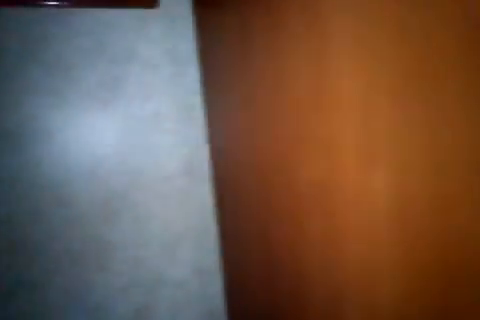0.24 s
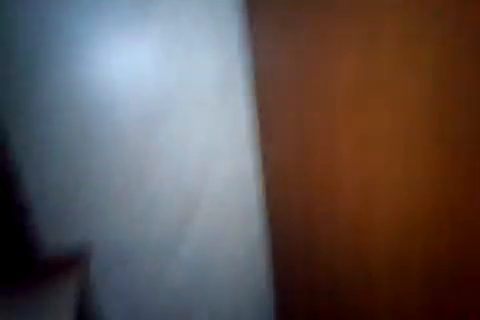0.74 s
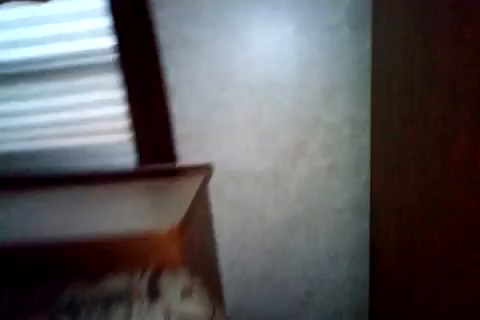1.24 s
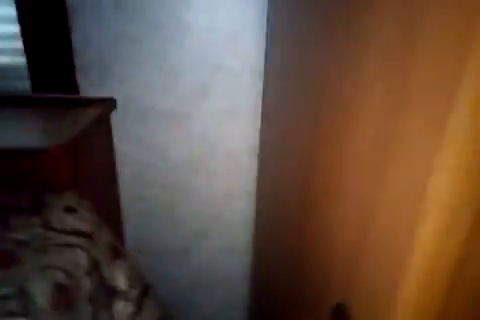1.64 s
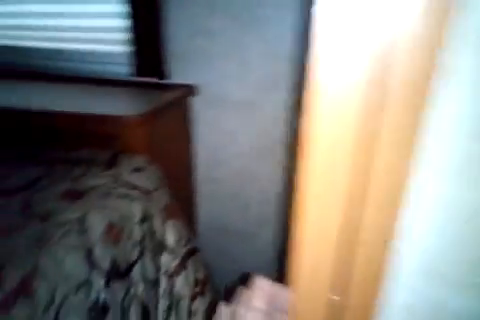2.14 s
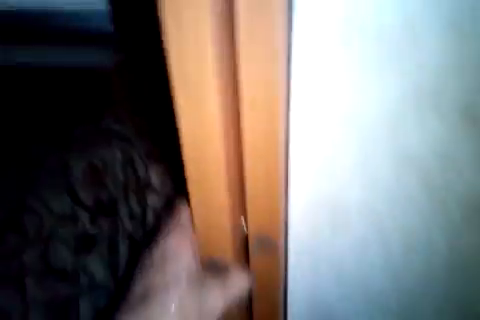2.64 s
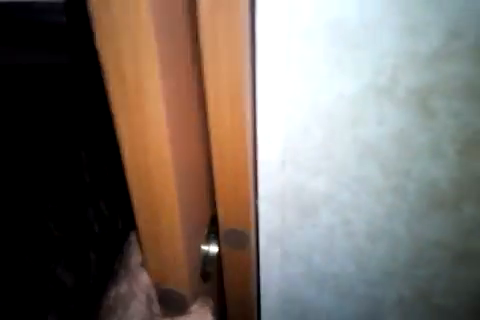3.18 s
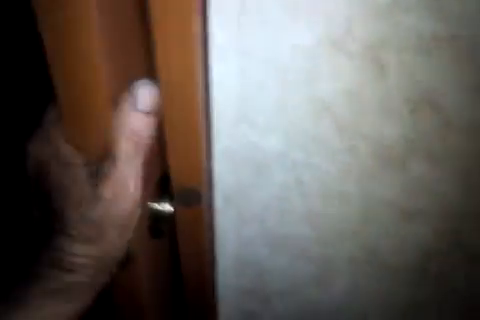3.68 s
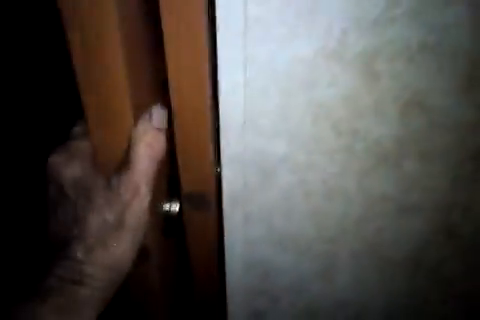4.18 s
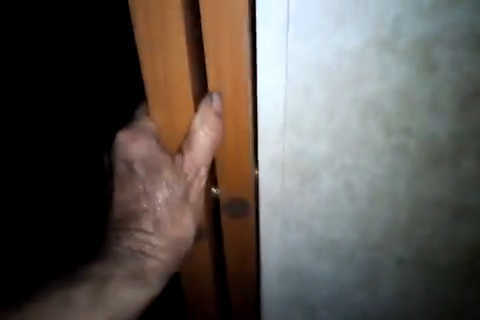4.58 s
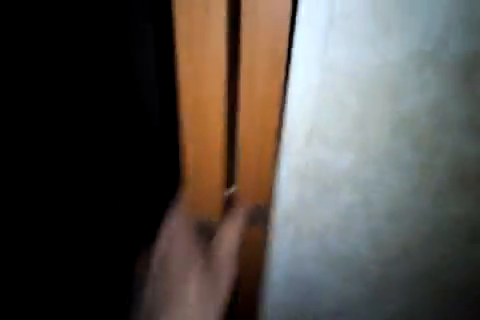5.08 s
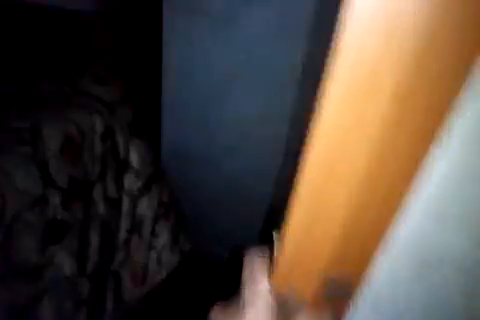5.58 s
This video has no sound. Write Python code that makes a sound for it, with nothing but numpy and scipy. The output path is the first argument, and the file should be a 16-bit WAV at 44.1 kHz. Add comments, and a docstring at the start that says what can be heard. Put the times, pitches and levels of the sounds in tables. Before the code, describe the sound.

Close to the microphone in a small, padded vehicle cabin, a hand moves a light wooden folding door. Faint taps and brushing come first, then a sharp clack and low thumps near two seconds, a pause, a loud clattering bang near four, and softer knocks afterwards. A faint low background noise stays steady.

```python
"""Small knocks and light brushing over a steady low background: a hand folds and shuts a light wooden door
close by, inside a small padded cabin. The panels thump and rumble as they slide: blows and slips ring their
modes. Catch, hinges and door edge click and rattle: contact noise, heard directly and through the ringing modes
of catch and door edge. Skin and cloth brush the wood as shaped slips; the hinge squeaks faintly."""
import sys
import numpy as np
from scipy import signal
from scipy.fft import rfft, irfft
from scipy.io import wavfile
from scipy.ndimage import uniform_filter1d

SR = 44100
rng = np.random.default_rng(int(sys.argv[2]) if len(sys.argv) > 2 else 0)


def digitize_waveform(pressure):
    """Quantize a signal to 16-bit integers and store it at the path in sys.argv[1].

    Rows of a 2-D input are taken as channels; values are limited to [-1, 1].
    """
    field = np.atleast_2d(pressure).T
    bounded = np.clip(field, -1, 1)
    quanta = np.round(bounded * 32767).astype(np.int16)
    wavfile.write(sys.argv[1], SR, quanta)


N = 256662


def gain_of(db):
    """Amplitude factor for a level in dB."""
    return 10 ** (np.asarray(db) / 20)


def dying(t, t60):
    """Exponential decay that falls 60 dB in t60 seconds."""
    return gain_of(-60 * t / t60)


def evened(x):
    """Scales x to an RMS of one."""
    return x / np.sqrt(np.mean(x ** 2) + 1e-20)


def bins(length):
    """Frequencies in Hz of the spectrum of a sound this many samples long."""
    return np.fft.rfftfreq(length, 1 / SR)


def add(mix, start_s, sound):
    """Lays a sound into the mix at its start, cut off at the end of the mix."""
    part = mix[round(start_s * SR):][:len(sound)]
    part += sound[:len(part)]


def coloured(x, points):
    """Shapes the spectrum of x by (Hz, dB) points, joined along log frequency."""
    point_hz, point_db = np.transpose(points)
    curve_db = np.interp(np.log(bins(len(x)) + 1), np.log(point_hz + 1), point_db)
    return irfft(rfft(x) * gain_of(curve_db), len(x))


def near(hz, centre_hz, octaves):
    """Gain that falls away on both sides of the centre that a blow excites."""
    return np.exp(-.5 * (np.log2((hz + 1) / centre_hz) / max(octaves, .1)) ** 2)


def ring(hz, gain, t60, t):
    """A sum of dying modes."""
    modes = dying(t, t60[:, None]) * np.sin(2 * np.pi * hz[:, None] * t)
    return gain @ modes


# tone of air and electronics: pitch_hz, relative level_db per Hz
BACKGROUND_TONE = [(12, -61), (20, -9), (107, 0), (347, -9), (780, -15.5), (897, -16.5), (1910, -23.5),
                   (4540, -24.5), (6530, -28.5), (8400, -39.5), (13500, -41.5), (14700, -28.5),
                   (16000, -40)]
BACKGROUND_DB = -57  # RMS


def background():
    """Steady noise of air and electronics, shaped from white noise."""
    return gain_of(BACKGROUND_DB) * evened(coloured(rng.standard_normal(N), BACKGROUND_TONE))


# faint hinge squeaks: start_s, length_s, level_db (RMS before the swell)
HINGE_SQUEAKS = [(4.328, 0.18, -68), (5.282, 0.24, -72)]
SQUEAK_HZ, SQUEAK_OCTAVES = 4630, 0.049


def squeaks():
    """A narrow hiss that swells and fades."""
    out = np.zeros(N)
    for start_s, length_s, level_db in HINGE_SQUEAKS:
        t = np.arange(round(length_s * SR)) / SR
        octaves_away = np.log2((bins(len(t)) + 1) / SQUEAK_HZ)
        band = np.exp(-.5 * (octaves_away / SQUEAK_OCTAVES) ** 2)
        hiss = irfft(rfft(rng.standard_normal(len(t))) * band, len(t))
        swell = np.sin(np.pi * t / length_s)
        add(out, start_s, gain_of(level_db) * swell * evened(hiss))
    return out


def slips(per_s, spread_db):
    """Uneven stick-slip impulses of random sign; a few are larger."""
    size_db = spread_db * np.minimum(rng.exponential(1, N), 4)
    size = gain_of(size_db) * rng.choice([-1., 1.], N)
    return size * (rng.random(N) < per_s / SR)


# the door being moved and rubbed: time_s, rumble_db in the panels, brushing_db on the surface
DOOR_MOVES = [(0, -66, -53), (.08, -53, -59), (.23, -66, -64), (.46, -73, -63), (.9, -51, -61),
              (1.04, -60, -52.5), (1.14, -78, -59), (1.44, -45.5, -58), (1.54, -46, -47), (1.61, -42, -53),
              (1.68, -43.5, -63), (1.8, -32, -39), (1.94, -47, -48.5), (2.04, -38.5, -57), (2.2, -47, -62),
              (2.32, -40, -50), (2.44, -26, -42), (2.53, -34, -44), (2.61, -43, -59), (2.74, -47, -57),
              (3.1, -61, -65), (3.3, -54, -65), (3.6, -49, -62), (3.76, -56, -63), (3.84, -51, -48),
              (3.91, -41, -33), (3.96, -27, -36.5), (4.04, -28, -46), (4.11, -44, -63), (4.18, -52, -63),
              (4.24, -45, -61), (4.7, -57, -65), (4.97, -64, -71), (5.08, -45, -66), (5.23, -56, -70),
              (5.39, -54, -60), (5.51, -54.5, -63), (5.63, -44.5, -56.5), (5.82, -54, -69)]
# panel modes, also rung by the thumps: pitch_hz, level_db, ring time (factor on a base t60)
PANEL_MODES = [(35.7, -19, 0.28), (52, -5.5, 1.43), (77.5, -0.5, 0.67), (108, -1.5, 0.67), (164, 0, 0.54),
               (204.7, 2, 0.36), (271.9, 0.5, 0.79), (334, 3, 0.56), (439.8, -12, 1.12), (483, -6, 1.16),
               (560.5, 3.5, 0.55), (723, -5.5, 0.6), (795.4, 3, 0.86), (961, 24, 0.24)]
# tone of skin on wood: pitch_hz, relative level_db per Hz
SKIN_TONE = [(240, -31), (400, -2), (527, -7), (646, -5.5), (1870, -18.5), (2060, -21), (7000, -45),
             (9100, -60), (15400, -120)]
# tone of cloth on wood: pitch_hz, relative level_db per Hz
CLOTH_TONE = [(590, -11), (1000, 4.5), (1430, -3), (2330, 0.5), (4690, -4), (6460, -3.5), (9000, -34),
              (11700, -55), (19800, -120)]
# light brushing leans to cloth, firm brushing is skin: cloth share at LIGHT_DB, and its change per dB
LIGHT_DB, CLOTH_SHARE, CLOTH_PER_DB = -60.5, 0.44, -0.08


def moving():
    """Slips drive the panel modes as rumble; finer slips give the brushing, dull for skin, bright for cloth."""
    now, t = np.arange(N) / SR, np.arange(6000) / SR
    time_s, *levels = np.transpose(DOOR_MOVES)
    rumble_db, brush_db = (np.interp(now, time_s, level) for level in levels)

    hz, mode_db, lasting = np.transpose(PANEL_MODES)
    body = ring(hz, gain_of(mode_db) * near(hz, 155, 0.95), 0.11 * lasting, t)
    rumble = evened(signal.oaconvolve(slips(320, .8), body)[:N])

    fine = slips(5000, 2.5)
    cloth = np.clip(CLOTH_SHARE + CLOTH_PER_DB * (brush_db - LIGHT_DB), 0, 1)
    brush = (1 - cloth) * evened(coloured(fine, SKIN_TONE))
    brush += cloth * evened(coloured(fine, CLOTH_TONE))
    return gain_of(rumble_db) * rumble + gain_of(brush_db) * brush


# dull blows on the panels: start_s, level_db, centre pitch_hz, base t60_s (scaled for each mode)
PANEL_BLOWS = [(.111, -41.5, 465, .067), (.146, -41.5, 86, .17), (.199, -45, 62, 0.16),
               (.746, -44, 514, .25), (.766, -42.5, 93, .37), (.797, -40.5, 304, 0.1),
               (1.129, -42, 283, 0.45), (1.168, -41.5, 312, 0.27), (1.439, -36.5, 191, 0.28),
               (1.479, -32, 67, .11), (1.594, -25, 73, 0.23), (1.694, -34.5, 261, 0.2),
               (1.716, -27.5, 280, 0.29), (1.732, -23, 159, 0.15), (1.799, -29, 92, 0.89),
               (1.852, -17, 282, .2), (1.877, -16.5, 161, 0.18), (1.914, -16.5, 82, 0.25),
               (1.945, -22, 83, 0.073), (2.068, -33, 97.5, 0.15), (2.147, -34.5, 67, 0.26),
               (2.33, -30, 130, 0.16), (2.36, -23.5, 169, 0.38), (2.401, -26, 192, 0.14),
               (2.444, -24, 131, 0.4), (2.469, -10, 152, 0.27), (2.489, -19, 180, 0.12),
               (2.529, -28, 173, 0.29), (2.7, -37.5, 77.5, 0.16), (3.276, -39.5, 108, 0.13),
               (3.299, -33.5, 334, .6), (3.338, -31.5, 122, 0.18), (3.399, -34, 197, 0.083),
               (3.649, -41, 328, .47), (3.781, -20, 185, 0.12), (3.796, -17, 131, 0.26),
               (3.817, -10, 97, 0.092), (3.833, -12.5, 570, .2), (3.848, -16.5, 237, 0.38),
               (3.86, -23, 119, 0.25), (3.891, -21.5, 67, .2), (3.954, -17, 188, .37),
               (3.981, -13, 159, 0.24), (4.009, -19.5, 209, .34), (4.036, -18, 148, 0.27),
               (4.06, -29, 320, 0.18), (4.088, -33, 160, .25), (4.147, -35.5, 89, 0.16),
               (4.205, -35, 94, 0.34), (4.247, -39.5, 102, .27), (4.328, -37, 103, 0.18),
               (4.4, -40.5, 104, 0.11), (4.538, -42.5, 267, 0.5), (4.677, -40.5, 125, 0.52),
               (4.718, -38, 91, .27), (4.801, -42, 114, 0.34), (5.015, -40.5, 101, 0.23),
               (5.056, -41.5, 146, 0.2), (5.123, -42.5, 112, 0.54), (5.161, -34, 202, 0.071),
               (5.528, -29.5, 97, 0.15), (5.558, -25.5, 108, 0.18), (5.592, -30, 320, .2),
               (5.61, -27.5, 87.5, 0.16), (5.644, -35, 103, 0.42), (5.707, -34.5, 94, 0.44)]
THUMP_OCTAVES, THUMP_NARROWING = 0.53, .09  # spread at 100 Hz, less per octave up
FRAME_DB, FRAME_PER_DB = -10.5, -0.0538  # stiff frame's share in a -29 dB blow, change per dB of blow


def thumps():
    """A soft blow rings the panel modes near its centre and the frame's around 379 Hz, both building gently."""
    t, out = np.arange(9000) / SR, np.zeros(N)
    hz, mode_db, lasting = np.transpose(PANEL_MODES)
    # each blow's modes are detuned a little at random
    detune = 1 + 0.02 * rng.standard_normal((len(PANEL_BLOWS), len(hz)))
    for (start_s, level_db, centre_hz, t60_s), shift in zip(PANEL_BLOWS, detune):
        octaves = THUMP_OCTAVES - THUMP_NARROWING * np.log2(centre_hz / 100)
        panel_gain = gain_of(mode_db) * near(hz, centre_hz, octaves)
        panel = ring(hz * shift, panel_gain, t60_s * lasting, t)
        panel *= (1 - np.exp(-t * centre_hz / 0.36)) ** 2  # builds over about a cycle of the centre

        frame_gain = gain_of(mode_db) * near(hz, 379, 0.61)
        frame = ring(hz / shift, frame_gain, 0.39 * t60_s * lasting, t)
        frame *= (1 - np.exp(-t / 0.0071)) ** 2
        frame_share = gain_of(FRAME_DB + FRAME_PER_DB * (level_db + 29))

        blow = panel / abs(panel).max() + frame_share * frame / abs(frame).max()
        add(out, start_s, gain_of(level_db) * blow)
    return out


# knocks and short scrapes of catch, hinge and door edge:
# start_s, level_db, centre pitch_hz, spread_octaves, rise_ms (twice the time constant), contact noise t60_s
CATCH_KNOCKS = [(.003, -35, 900, .9, 2.4, .06), (.052, -30, 1100, 1.2, 1.6, 0.049),
                (.085, -35, 1100, 1.4, 2.4, .12), (.11, -39, 700, .77, 4.5, .17),
                (.177, -36, 4970, .3, .9, .1), (.184, -37, 4400, .3, 1.3, .15),
                (.197, -41.5, 1500, .57, 2.1, .07), (.735, -38, 1160, .74, 2.6, 0.085),
                (.748, -29, 740, .91, 1.3, 0.079), (.93, -46.5, 5900, .35, 8, 0.33),
                (.97, -45, 3960, .68, 8, 0.39), (1.05, -39.5, 2000, 1.1, 1.9, 0.1),
                (1.133, -30, 1100, 1.2, 2.2, 0.091), (1.17, -32, 1120, 1.3, 5, 0.13),
                (1.301, -32.5, 2020, .82, 0.34, 0.062), (1.42, -40, 4000, .58, 0.59, .042),
                (1.423, -29.5, 1540, 1.1, 3.2, 0.094), (1.446, -29, 1250, .98, 2.55, 0.21),
                (1.456, -32, 3850, .52, 0.49, 0.14), (1.475, -40, 4500, .8, 6.4, .12),
                (1.499, -36.5, 1670, .9, 1.6, 0.094), (1.596, -38, 1500, .63, 1.7, .071),
                (1.692, -31.5, 1980, 1.1, 1.4, 0.082), (1.728, -29, 1470, 1.3, 0.22, 0.21),
                (1.777, -29, 3000, 1.1, 1.7, 0.26), (1.821, -27, 1730, .57, .68, .066),
                (1.851, -8, 1800, 1.06, 0.82, .11), (1.879, -31, 1500, 1.2, 1.2, .16),
                (2.062, -31, 2330, .92, 2.5, .23), (2.254, -32.5, 2400, .58, 0.39, .11),
                (2.258, -29.5, 1100, .6, 2.24, .078), (2.291, -40, 2490, 1.14, .5, .16),
                (2.36, -35, 800, 1.1, 9.2, .22), (2.4, -31, 800, 1.05, 6, 0.12),
                (2.443, -28.5, 2150, .87, .6, 0.3), (2.469, -42, 5000, .68, 2.6, 0.19),
                (2.486, -25, 3180, .45, 7.6, .14), (2.529, -32.5, 2900, .46, 2.8, 0.21),
                (2.555, -29.5, 1800, .98, 1.6, 0.12), (2.74, -47.5, 2500, 1.05, 2.3, .09),
                (2.765, -40, 1500, 1.1, 2.5, .072), (3.313, -37.5, 4500, .98, .9, 0.14),
                (3.33, -36, 890, .9, 2.6, .16), (3.397, -45.5, 5000, .47, 1.7, .065),
                (3.643, -39.5, 890, 1.05, 2.2, 0.083), (3.775, -31, 1150, .88, .39, 0.12),
                (3.786, -40.5, 4500, .61, 2.2, 0.17), (3.801, -27, 1480, 1.1, 3.4, 0.36),
                (3.814, -20.5, 2620, .74, 5.2, 0.14), (3.827, -15.5, 3520, .74, 2.2, 0.042),
                (3.835, -13, 1790, 1.05, 0.46, 0.092), (3.841, -15, 835, .48, 2.9, 0.32),
                (3.849, -20.5, 2700, .53, 1.6, 0.12), (3.859, -21, 990, .65, 1.9, 0.065),
                (3.884, -23, 1500, 1.05, 2.77, 0.14), (3.903, -27.5, 3770, .64, 4, .053),
                (3.914, -19.5, 3000, .95, 5.5, .086), (3.953, -24, 1480, .3, .9, .23),
                (3.974, -32, 4300, .17, .84, .14), (3.978, -21.5, 1460, 1.15, 5.9, 0.23),
                (4.006, -29, 2800, .33, 6.4, .13), (4.213, -42.5, 900, 1.1, 4.9, .22),
                (4.257, -43, 1350, 1.1, 3, 0.13), (4.516, -46, 5260, .44, 3, 0.064),
                (4.53, -39, 800, .88, 4.6, 0.18), (4.563, -46, 4000, 1.5, .43, 0.046),
                (4.73, -47, 1500, .9, 6, 0.23), (4.775, -40, 2800, .67, 1.6, 0.054),
                (5.01, -45.5, 800, .52, 5.8, .5), (5.054, -39, 890, .6, 4.5, 0.12),
                (5.131, -34, 970, .77, 3.7, .083), (5.33, -39, 800, 1.05, 4.7, 0.1),
                (5.434, -49, 5200, .31, 2.5, .16), (5.525, -41, 910, 1.1, 1.6, 0.56),
                (5.543, -33, 1900, .6, 2.1, .12), (5.551, -26.5, 1140, .65, 2.1, 0.093),
                (5.561, -25, 3500, .83, 0.17, 0.017), (5.571, -36.5, 2500, 1.1, 3, 0.16),
                (5.597, -35, 3750, .76, .25, 0.021), (5.664, -38, 1600, 1.3, 2.3, 0.06)]
# pings, where one part of the catch rings alone: start_s, level_db, centre pitch_hz, contact noise t60_s
CATCH_PINGS = [(0.188, -38, 2550, .08), (1.301, -40, 1660, .2), (1.352, -42, 1660, .08),
               (1.356, -49, 3800, .045), (1.541, -43, 1660, .15), (2.182, -46, 1290, .07),
               (2.289, -42.5, 5900, .08), (3.775, -34, 1150, .1), (3.972, -26, 5900, .26)]
# catch and door edge modes: pitch_hz, level_db, t60_s
CATCH_MODES = [(720, 10, 0.07), (800, 13.5, 0.043), (881, 9, 0.2), (1026, 9, 0.081), (1200, 3.5, 0.079),
               (1430, 7, 0.05), (1660, -2, 0.11), (2060, -15, 0.033), (2550, -6.5, 0.037),
               (2806, -12, 0.059), (3115, -9.5, 0.053), (3790, -11, 0.088), (4300, -3, 0.035),
               (4690, -1.5, 0.042), (5770, -17, 0.046), (5900, -17, 0.086), (6230, -14, .07)]
KNOCK_RING, PING_RING = .38, .68  # share heard through the modes
PING_OCTAVES, PING_RISE_MS = .22, 1.1


def knocks():
    """Contact noise swelling around the blow's centre, with a hard tick during its rise when quick,
    heard directly and through the modes near it."""
    t, out = np.arange(6144) / SR, np.zeros(N)
    hz, mode_db, mode_t60 = np.transpose(CATCH_MODES)
    blows = [(*row, KNOCK_RING) for row in CATCH_KNOCKS]
    for start_s, level_db, centre_hz, t60_s in CATCH_PINGS:
        blows.append((start_s, level_db, centre_hz, PING_OCTAVES, PING_RISE_MS, t60_s, PING_RING))

    for start_s, level_db, centre_hz, octaves, rise_ms, t60_s, share in blows:
        chatter, drive, bounce = rng.standard_normal((3, len(t)))
        band = near(bins(len(t)), centre_hz, octaves)
        impulse = np.zeros(len(t))
        impulse[round(rise_ms * SR / 1000) + 8] = 1
        tick = irfft(rfft(impulse) * (band + 0.045))  # the hard edge reaches the top of the band
        tick *= 1.6 * np.exp(-rise_ms / 0.95) / abs(tick).max()  # only a quick blow gives a clean tick

        rise = (1 - np.exp(-t * 2000 / rise_ms)) ** 2
        wobble = evened(uniform_filter1d(bounce, size=160))
        rise *= gain_of(3.0 * np.minimum(t / 0.01, 1) * wobble)  # loose parts bounce

        crack_fall = dying(t, t60_s) + 0.41 * dying(t, 0.0083)
        crack = evened(irfft(rfft(chatter) * band)) * rise * crack_fall

        body = ring(hz, gain_of(mode_db) * near(hz, centre_hz, 0.42 * octaves), mode_t60, t)
        push = (drive + 9.8 * impulse) * rise * dying(t, 0.24 * t60_s)
        rung = signal.fftconvolve(push, body)[:len(t)]

        knock = tick + (1 - share) * crack / 2.72 + share * rung / abs(rung).max()
        add(out, start_s, gain_of(level_db) * knock)
    return out


CABIN_T60_S, CABIN_DB = 0.23, -11.5


def cabin(x):
    """Short tail of dense reflections from the near walls, as decaying noise."""
    t = np.arange(9000) / SR
    build = np.minimum(t / 0.013, 1)
    taps = rng.standard_normal(len(t)) * dying(t, CABIN_T60_S) * build
    return gain_of(CABIN_DB) * signal.oaconvolve(x, taps / np.linalg.norm(taps))[:N]


def scene():
    """Knocks and thumps with the cabin's tail, the moving door and its hinge."""
    sharp, dull = knocks(), thumps()
    tail = cabin(sharp + gain_of(-7.5) * dull)
    return (sharp + dull + tail + moving() + squeaks())[None]


# microphone colour: pitch_hz, gain_db
MICROPHONE_TONE = [(20, -21.2), (70, -3.1), (5500, .4), (7000, -2.7), (8500, -8.8), (12000, -3.2),
                   (16000, -21)]
EDGE_HZ = 15800  # top of the band


def record(dry):
    """Microphone colour on the scene, the steady background, then the band limit on both."""
    heard = coloured(dry[0], MICROPHONE_TONE) + background()
    lowpass = signal.firwin(511, EDGE_HZ, window=("kaiser", 9), fs=SR)
    return signal.oaconvolve(heard, lowpass, "same")[None]


dry = scene()
out = record(dry)
digitize_waveform(out)
```